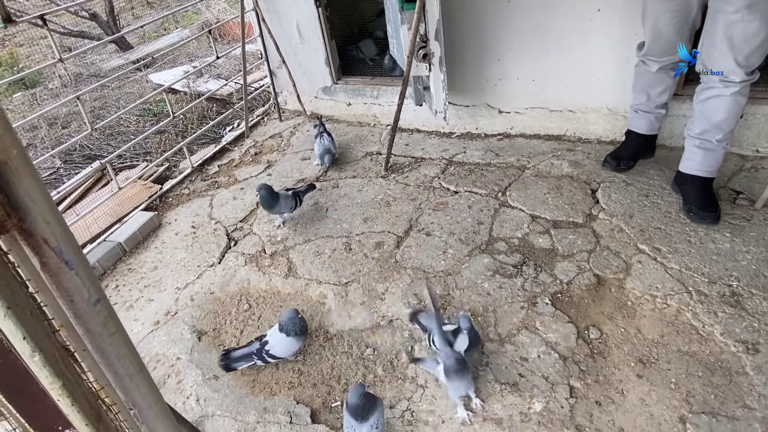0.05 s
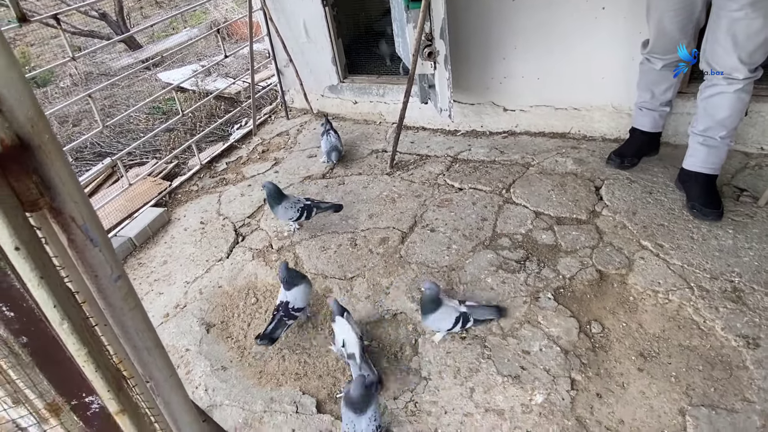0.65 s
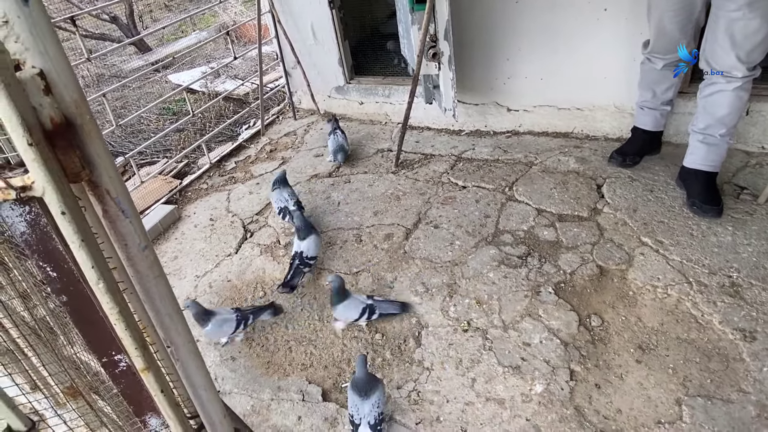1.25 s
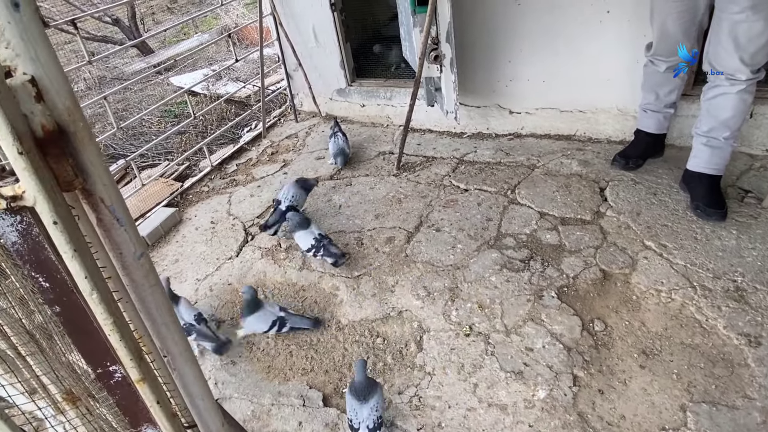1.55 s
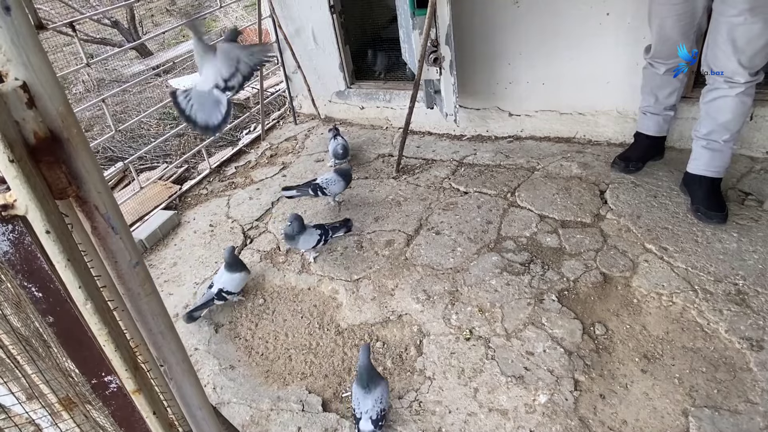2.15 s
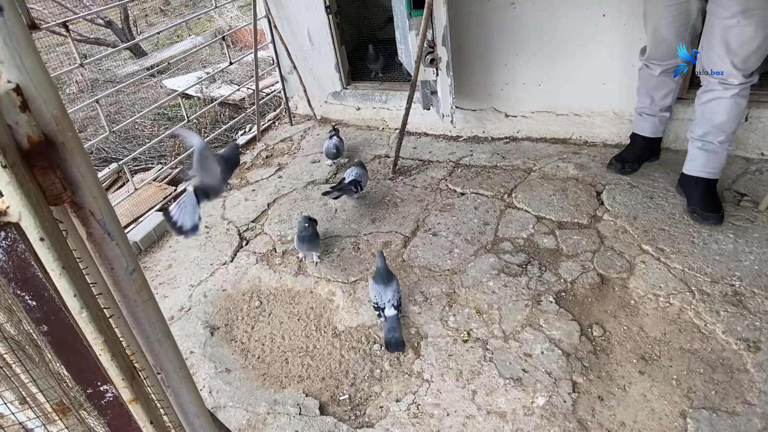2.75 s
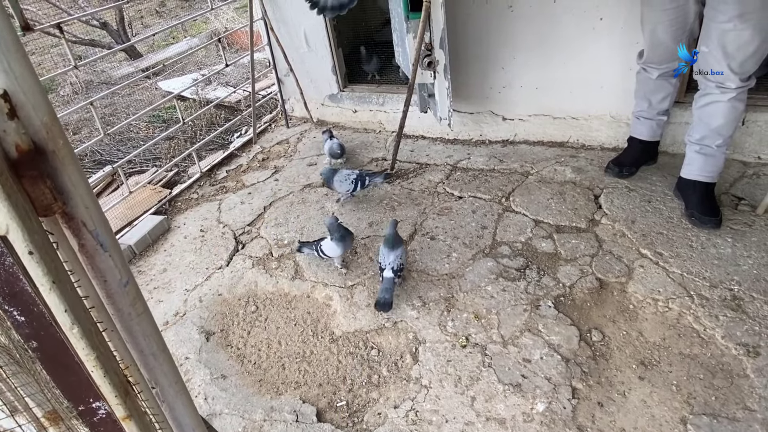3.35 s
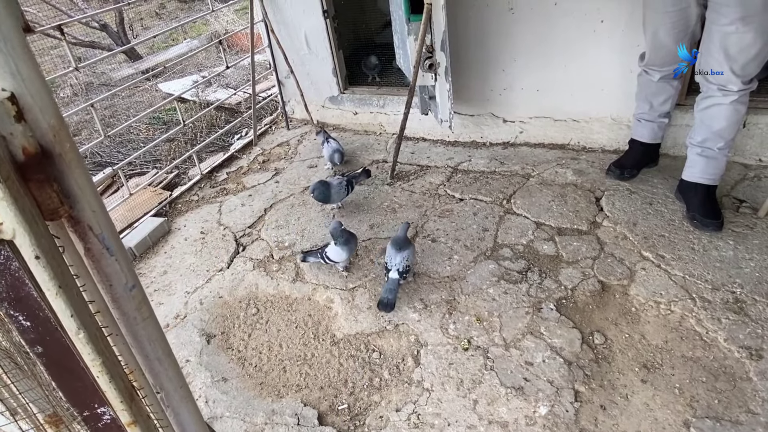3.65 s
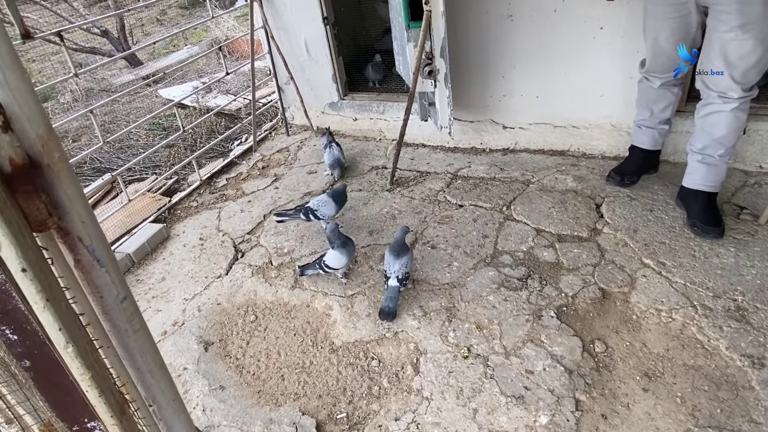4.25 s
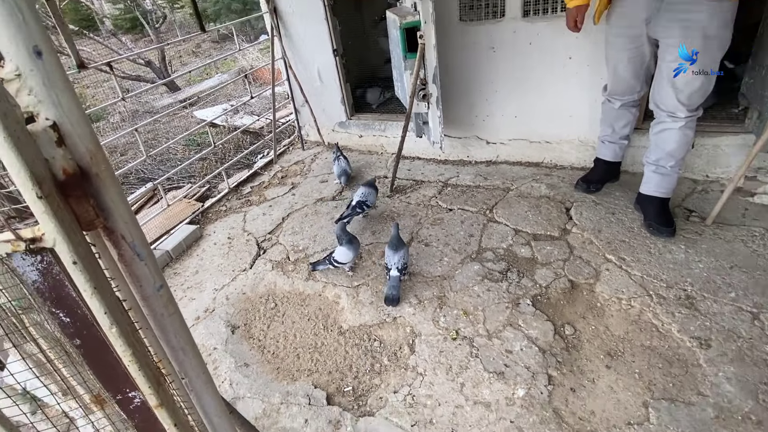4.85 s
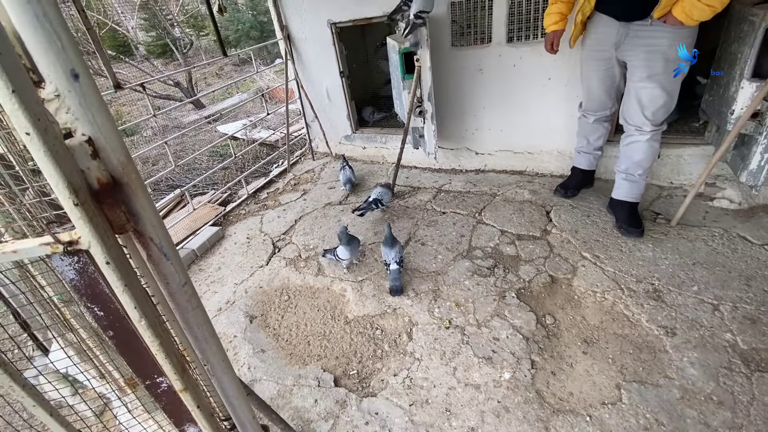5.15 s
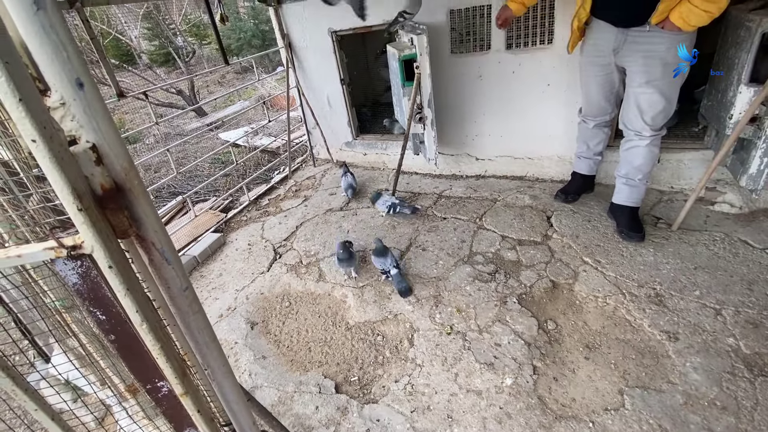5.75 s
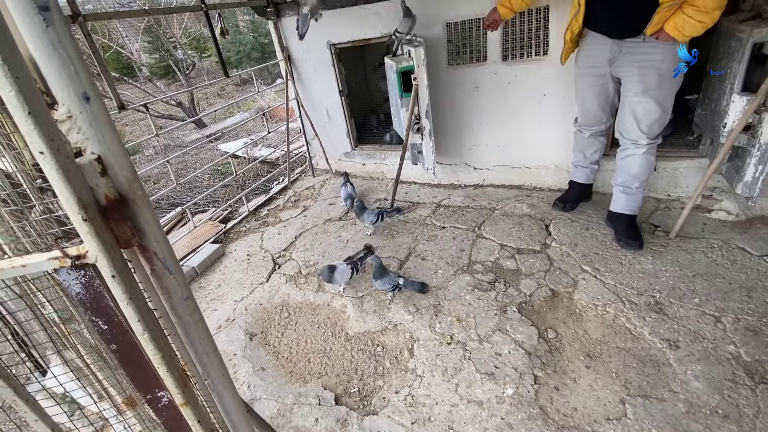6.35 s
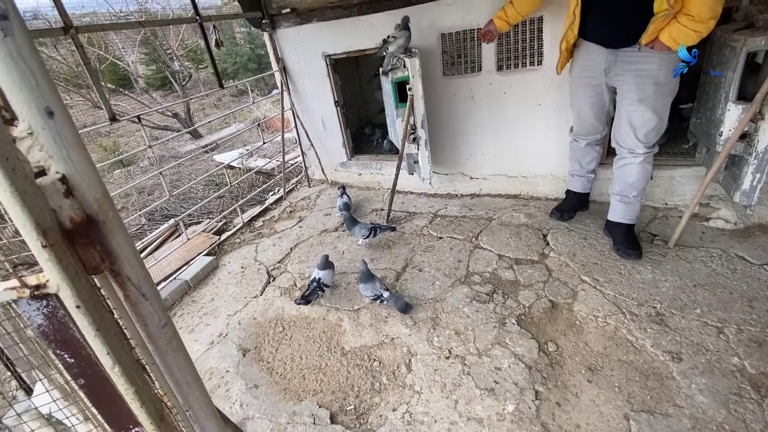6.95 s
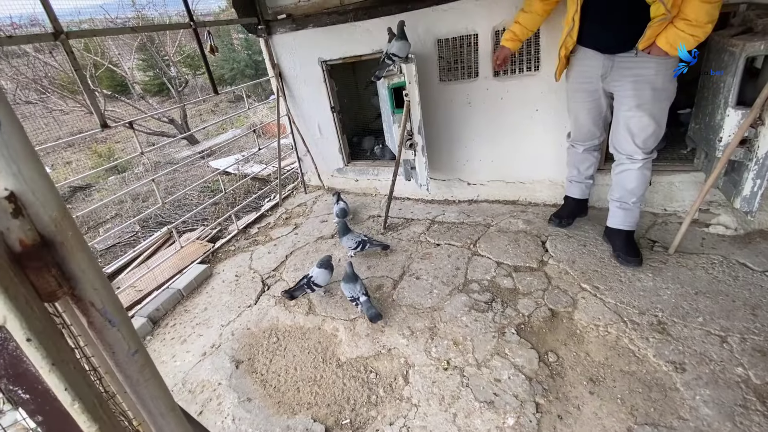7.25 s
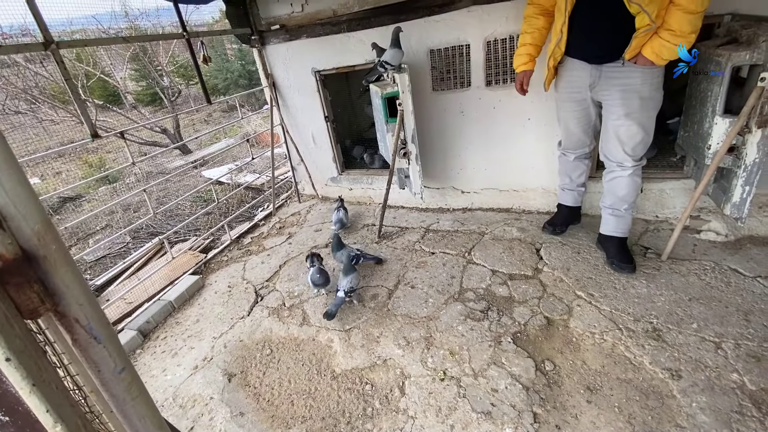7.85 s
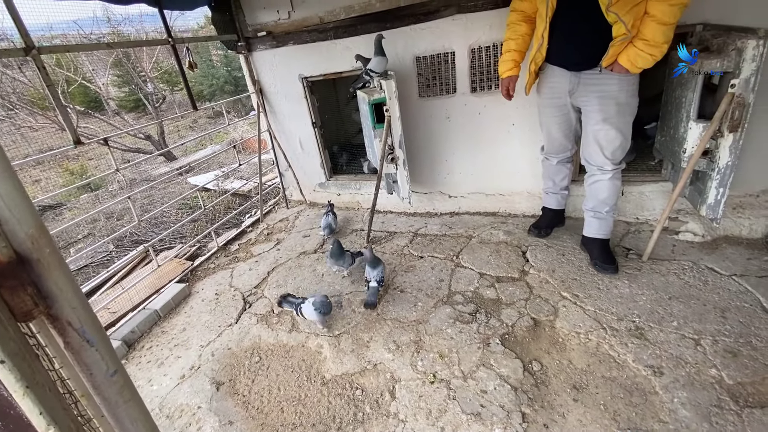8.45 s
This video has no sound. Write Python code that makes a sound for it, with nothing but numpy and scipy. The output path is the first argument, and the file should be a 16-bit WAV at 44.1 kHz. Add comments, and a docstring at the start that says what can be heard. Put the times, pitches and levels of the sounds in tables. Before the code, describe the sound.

In a quiet concrete yard, several pigeons coo in brief, gliding bouts. A sharp hollow knock opens the scene, followed by a run of clapping wingbeats that buffet the nearby microphone. Feathers rustle and feet scuff on grit between the coos. Later come a soft rush of wings, a few more claps and a thin, faint metallic ring under the last coos.

```python
"""Pigeons courting in a yard

Pigeons coo on the concrete beside their loft: gliding near-sine notes, some clean, some gurgling.
Birds squabble, take off and land with clapping wings, whose draught rumbles on the microphone.
A hard, hollow knock comes at the start, feet scuff on grit, and a thin metallic ring lingers at the end."""
import sys
import numpy as np
from scipy import signal
from scipy.fft import rfft, irfft, next_fast_len
from scipy.io import wavfile
from scipy.ndimage import uniform_filter1d, minimum_filter1d, map_coordinates

SR = 44100
rng = np.random.default_rng(int(sys.argv[2]) if len(sys.argv) > 2 else 0)


def file_out(sig):
    """Save sig as 16-bit WAV at sys.argv[1]."""
    # one column per channel
    cols = np.atleast_2d(sig).T
    # limit, then scale
    lim = np.clip(cols, -1, 1)
    pcm = np.round(lim * 32767).astype(np.int16)
    wavfile.write(sys.argv[1], SR, pcm)


N = 380141


def amp(db):
    """Decibels to gain."""
    return 10 ** (np.asarray(db) / 20)


def unit(x):
    """Scale to rms 1."""
    return x / np.sqrt(np.mean(x ** 2) + 1e-20)


def along(points, hz):
    """Read (Hz, value) points on a log frequency axis."""
    freqs, values = np.transpose(points)
    return np.interp(np.log(hz + 1), np.log(freqs + 1), values)


def fader(rows):
    """A fader ride in dB through (seconds, dB) points, silent outside them."""
    return np.interp(np.arange(N) / SR, *np.transpose(rows), left=-140, right=-140)


def wobble(rate, size):
    """A smooth random curve with rate knots a second."""
    knots = rng.standard_normal(int(size * rate / SR) + 4)
    return map_coordinates(knots, [np.arange(size) * rate / SR])


def phase_of(hz):
    """Running phase of a moving pitch."""
    return 2 * np.pi * np.cumsum(hz) / SR


def filtered(x, response):
    """EQ a sound with a gain given as a function of Hz."""
    size = next_fast_len(len(x) + 8192)
    return irfft(rfft(x, size) * response(np.fft.rfftfreq(size, 1 / SR)), size)[:len(x)]


def noise(spectrum, size):
    """Coloured noise of rms 1."""
    return unit(filtered(rng.standard_normal(size), lambda hz: amp(along(spectrum, hz))))


def narrow(hz, width, size):
    """A narrow noise band of rms 1 around a steady or moving pitch."""
    phase = phase_of(hz * np.ones(size))
    return unit(wobble(width, size) * np.sin(phase) + wobble(width, size) * np.cos(phase))


def patchy(x, depth_db):
    """Give noise peaks and dips that shift its colour from moment to moment."""
    spectra = signal.stft(x, nperseg=512)[2]
    patches = uniform_filter1d(rng.standard_normal(spectra.shape), size=5, axis=0)
    patches = uniform_filter1d(patches, size=9, axis=1)
    return signal.istft(spectra * amp(depth_db * unit(patches)), nperseg=512)[1][:N]


def burst(t, rise, t60):
    """A quick attack and an exponential decay."""
    return (1 - np.exp(-t / rise)) * amp(-60 * t / t60)


def add(track, s, sound):
    """Mix a sound into the track from s seconds on."""
    start = round(s * SR)
    sound = sound[max(-start, 0):]
    part = track[max(start, 0):][:len(sound)]
    part += sound[:len(part)]


def flurry(s, length, db, fade, rise, fall):
    """One flurry's envelope in dB: it rises, drifts while it lasts, then falls (slopes in dB a second)."""
    end_db = db - fade * length
    return fader([(s - 1, db - rise), (s, db), (s + length, end_db), (s + length + 1, end_db - fall)])


# The colours of rustling and of buffeting air. Each row: frequency in Hz, level in dB.
RUSTLE_COLOUR = [(130, -30.5), (280, 4), (500, 5), (850, 2.5), (1500, -4.5), (2300, -11), (4000, -17.5),
                 (5500, -29.5), (9000, -34.5), (12000, -59.5)]
DRAUGHT_COLOUR = [(11, -39.5), (18, 2.5), (41, 0.5), (76, -13.5), (113, -7), (157, -19), (300, -21),
                  (390, -48), (660, -120)]
# Flurries of bustle. Each row: start and length in seconds, relative rustle and draught levels in dB,
# fade in dB a second (negative swells).
FLURRIES = [ (0, 0.011, -68.5, -33.5, -2), (0.1, 0.11, -73, -41, 51), (0.278, 0.1, -56, -41, 6),
            (0.49, 0.14, -57, -36.5, 36), (0.708, 0.018, -65.5, -36.5, 23), (0.904, 0.24, -84.5, -66, 47.5),
            (1.516, 0.091, -72.5, -41, 54), (1.872, 0.32, -56.5, -43.5, -9.5),
            (2.344, 0.079, -66.5, -37, 18.5), (2.41, 0.15, -67, -41, 18), (2.59, 0.33, -56, -43.5, -20.5),
            (3.008, 0.21, -61, -46, 19), (3.307, 0.19, -67, -51, 3), (3.495, 0.22, -55.5, -42, 23),
            (3.848, 0.079, -62, -44.5, 26.5), (4.048, 0.62, -85, -66.5, 15), (4.448, 0.29, -76, -67, -12),
            (4.844, 0.21, -64, -43.5, -4), (5.114, 0.12, -59, -41.5, 44.5),
            (5.677, 0.099, -71.5, -44, 56.5), (5.882, 0.24, -72, -51, -41), (6.291, 0.34, -66.5, -37, 8),
            (6.62, 0.11, -54.5, -41, 3), (6.785, 0.39, -66.5, -46, 43), (7.286, 0.2, -61.5, -46.5, 1),
            (7.567, 0.31, -81, -69.5, 9.5), (8.486, 0.1, -65.5, -43.5, -57)]


def bustle(rustle_db=2, draught_db=-1, grain_db=2, fits_db=2, lumps_db=2):
    """Feathers and feet rustle in fits, and the air they stir buffets the microphone in lumps."""
    rustle_rides = [flurry(s, length, db, fade, rise=410, fall=180) for s, length, db, _, fade in FLURRIES]
    air_rides = [flurry(s, length, db, fade, rise=430, fall=220) for s, length, _, db, fade in FLURRIES]
    rustle = patchy(noise(RUSTLE_COLOUR, N), depth_db=4.3)
    rustle = unit(rustle * amp(grain_db * wobble(300, N) + fits_db * wobble(35, N)))
    draught = unit(noise(DRAUGHT_COLOUR, N) * amp(lumps_db * wobble(25, N)))
    return (amp(rustle_db + np.max(rustle_rides, axis=0)) * rustle
            + amp(draught_db + np.max(air_rides, axis=0)) * draught)


# The colour of pushed air. Each row: frequency in Hz, level in dB.
PUFF_COLOUR = [(60, -28), (170, -11.5), (290, 8), (450, 4.5), (750, -1.5), (1000, -5.5), (1600, -10),
               (3000, -46.5)]


def air_puff(size, note_hz, sharpness):
    """Air pushed by a wing sounds one broad, hollow note, at rms 1."""
    air = noise(PUFF_COLOUR, size)
    return unit(filtered(air, lambda hz: 1 / (1 + 1j * sharpness * np.log((hz + 1) / note_hz)) ** 2))


# The colour of swishing feathers. Each row: frequency in Hz, level in dB.
FEATHER_COLOUR = [(300, -24), (900, -8), (1700, 0), (2800, -5), (4200, -4.5), (6000, -14.5), (8500, -19.5),
                  (11000, -30.5), (15000, -29)]
# Wing strokes without a clap. Each row: peak time in seconds, swish level in dB,
# relative puff level in dB, the puff's note in Hz.
WING_STROKES = [(.004, -67, -32.5, 281), (.08, -49, -31, 580), (0.3, -54.5, -31.5, 269),
                (.505, -71, -41, 414), (.571, -55, -44.5, 427), (0.709, -58, -46.5, 604.4),
                (1.496, -78, -43, 351.5), (1.874, -57, -33.5, 535), (2.115, -53.5, -37, 504),
                (2.324, -60, -56, 1070), (2.595, -62, -46.5, 760), (2.697, -53, -40.5, 860),
                (2.837, -52, -31, 856), (3.18, -58.5, -58, 850), (3.351, -65.5, -54, 1060),
                (3.555, -57, -47, 680), (3.765, -59.5, -51.5, 897), (3.95, -64.5, -46.5, 555),
                (6.115, -65, -54.5, 900), (6.26, -64, -51.5, 810), (6.517, -63, -45, 820),
                (6.385, -58, -49.5, 1710), (6.47, -60, -46.5, 1470), (6.638, -59.5, -40.5, 810),
                (6.839, -75.5, -55, 1120), (6.71, -53, -42.5, 434), (7.342, -46, -51, 535),
                (7.398, -72, -51, 780), (8.526, -72, -45, 516)]


def wing_strokes(air_db=-1, t60=.14, grain_db=3, hover_s=6.04, hover_period_s=.131):
    """A free wing stroke swells, pushes a hollow puff of air and dies away; a hover is five even beats."""
    out, t = np.zeros(N), np.arange(-SR // 10, SR // 4) / SR
    hover = [(hover_s + hover_period_s * beat, -72.5, -43, 380) for beat in range(5)]
    for s, swish_db, puff_db, note_hz in WING_STROKES + hover:
        swell_s = .0099 * 446.4 / note_hz  # lower, wider sweeps take longer
        envelope = np.where(t < 0, np.exp(-(t / swell_s) ** 2), amp(-60 * t / t60))
        cutoff_hz = 6000 * np.exp(.39 * (swish_db + 56.5))  # harder strokes are brighter
        hiss = filtered(noise(FEATHER_COLOUR, len(t)), lambda hz: 1 / (1 + (hz / cutoff_hz) ** 2))
        swish = unit(hiss * amp(grain_db * wobble(460, len(t))))
        puff = air_puff(len(t), note_hz, sharpness=2.2)
        add(out, s + t[0], envelope * (amp(swish_db) * swish + amp(puff_db + air_db) * puff))
    return out


# The colour of the knock's crack. Each row: frequency in Hz, level in dB.
CRACK_COLOUR = [(400, -10.5), (1500, -9), (3200, -19), (4200, 2), (4850, 3), (5400, -10), (7500, -24),
                (8700, -24), (10500, -45.5), (15000, -56)]
# Modes of the knocked body. Each row: pitch in Hz, relative level in dB, 60 dB decay time in seconds.
BODY_MODES = [(269, -0.5, 0.059), (354, -9.5, 0.085), (488.6, -13, 0.054), (601, -16.5, 0.085),
              (830, -24, 0.11), (968, -21, 0.1), (1710, -36, 0.097), (2470, -37, 0.08)]


def knock(s=.0895, body_db=.5, crack_db=-15.5, splash_db=-24, rattle_db=-23):
    """A hard contact close by: a bright crack and a splash of noise; a hollow body rings and rattles."""
    out, t = np.zeros(N), np.arange(SR // 3) / SR
    body = sum(amp(db) * burst(t, .0025, t60) * np.sin(2 * np.pi * (hz * t + rng.random()))
               for hz, db, t60 in BODY_MODES)
    add(out, s + .00089, amp(body_db) * body)
    add(out, s, amp(crack_db) * noise(CRACK_COLOUR, len(t)) * burst(t, rise=.0002, t60=.017))
    add(out, s, amp(splash_db) * noise(RUSTLE_COLOUR, len(t)) * burst(t, rise=.00075, t60=.11))
    add(out, s, amp(rattle_db) * noise(PUFF_COLOUR, len(t)) * burst(t, rise=.0034, t60=.11))
    return out


# Dull bumps. Each row: start in seconds, relative level in dB, pitch in Hz.
BUMPS = [(0.092, -22.5, 120.5), (.703, -31, 147), (1.505, -43, 149.6), (2.612, -36, 76.4),
         (3.854, -37, 138.6), (4.735, -47, 157), (5.115, -26, 104), (7.326, -34.5, 34.7)]


def bumps(gain_db=7.5):
    """Soft, heavy contacts give a few uneven low cycles."""
    out, t = np.zeros(N), np.arange(SR // 4) / SR
    for s, db, hz in BUMPS:
        phase = phase_of(hz * (1 + .29 * wobble(130, len(t))))
        add(out, s, amp(db + gain_db) * burst(t, rise=.011, t60=.12) * np.sin(phase))
    return out


def glide(length, first_hz, last_hz, arch, level_db, attack_s=.0074, release_s=.0095, dome_db=.5):
    """Time, pitch and level of a coo: the pitch slides along an arch as the level rises, domes, falls."""
    t = np.arange(-SR // 20, (length + .06) * SR) / SR
    progress = np.clip(t / length, -.15, 1.15)
    bow = 4 * progress * (1 - progress)
    pitch = first_hz * (last_hz / first_hz) ** progress * 2 ** (arch * bow / 12)
    outside = np.maximum(-t, 0) / attack_s + np.maximum(t - length, 0) / release_s
    return t, pitch, level_db - dome_db * (1 - bow) - 10 * outside


def crop_gain(hz, resonance_hz=616, q=1.4):
    """The swollen crop resonates and damps the overtones above its note."""
    ratio = hz / resonance_hz
    return 1 / np.hypot(1 - ratio ** 2, ratio / q)


# The colour of air rasping through a rough coo. Each row: frequency in Hz, level in dB.
RASP_COLOUR = [(600, -8), (880, 3), (1150, -4.5), (1400, -26), (1700, -10.5), (2000, -4), (2250, -32.5),
               (4000, -40.5)]


def coo(pitch, db, rough, gurgle_hz=42, flutter=.8, hoarse=.6, jitter=.11, growl_db=-5, hiss_db=-18):
    """The syrinx sings a near sine; the crop colours its overtones, and a flutter makes it gurgle."""
    size = len(pitch)
    gurgle = np.sin(phase_of(gurgle_hz * (1 + .3 * wobble(30, size))))
    waver = .015 * wobble(40.5, size) + rough * jitter * (gurgle + wobble(171.1, size))
    phase = phase_of(pitch * (1 + waver))
    overtones = sum(amp(level) * np.sin(k * phase) * crop_gain(k * pitch)
                    for k, level in ((2, -34), (3, -40)))
    richness = amp(12 * rough + 1.15 * (db + 47))  # loud, rough notes have stronger overtones
    # irregular cycles smear the tone into a throaty band
    smear = hoarse * rough * (wobble(300, size) * np.sin(phase) + wobble(300, size) * np.cos(phase))
    # every other cycle of a rough note is stronger: a growl an octave down
    growl = amp(growl_db) * rough * np.sin(phase / 2)
    tremolo = (1 + rough * flutter * gurgle) * amp(1.23 * wobble(45, size))
    hiss = amp(hiss_db) * rough ** 2 * noise(RASP_COLOUR, size) * (1 + .5 * np.sin(phase))
    return amp(db) * tremolo * np.sqrt(2) * (np.sin(phase) + smear + growl + hiss + richness * overtones)


# The near reflection of the coos. Each row: delay in seconds, level in dB.
WALL_ECHOES = [(.019, -13.5)]
# Coo notes. Each row: start and length in seconds, first and last pitch in Hz, arch in semitones,
# level in dB, roughness from 0 to 1.
COO_NOTES = [(0.254, 0.05, 690, 584, -2, -48, 0.44), (0.323, 0.035, 517, 365, -1.5, -53, 0.18),
             (0.376, 0.0996, 370.3, 299.4, 2.5, -44.5, 0.09), (0.469, 0.1, 693, 539, -0.2, -52, 0.25),
             (1.357, 0.049, 356, 395, 0, -60.5, 0.64), (1.667, 0.13, 581.6, 543, 1, -61, 0.3),
             (1.965, 0.053, 392.5, 262, -0.6, -38.5, 0.48), (2.101, 0.32, 512.6, 437, -1, -57, 0.52),
             (3.084, 0.096, 430.3, 550, 0, -53, 0.18), (3.222, 0.058, 354, 336, 0.15, -53, 0.07),
             (3.388, 0.1, 476.6, 443, 0, -51.5, 0.31), (4.028, 0.083, 303.6, 363, 0.5, -52.5, 0.41),
             (4.12, 0.037, 505, 463, 0.2, -48.5, 0.13), (4.131, 0.015, 378, 350, 1.2, -46.5, 0.13),
             (4.319, 0.15, 490, 266.3, -2.5, -48.5, 0.2), (4.465, 0.051, 486, 450, 0.0, -50.5, 0.1),
             (4.535, 0.066, 473, 448, -2.1, -56.5, 0.31), (5.166, 0.092, 172.3, 323, 2, -55.5, 0.6),
             (5.272, 0.039, 230, 246, 0.5, -42, 0.5), (5.318, 0.049, 275, 246, 1.5, -38.5, 0.31),
             (5.41, 0.037, 275, 228.6, 2, -37.5, 0.33), (5.476, 0.056, 470, 444, 0, -50, 0.25),
             (5.522, 0.029, 330, 280, 0, -53, 0.87), (5.59, 0.12, 520, 457, 0.5, -66, 0.2),
             (5.704, 0.031, 483, 445, -1, -53.5, 0.33), (5.81, 0.043, 425, 366, 1.5, -53.5, 0.37),
             (5.927, 0.025, 336.4, 328, -0.4, -50, 0.14), (7.345, 0.13, 470, 583, 1.5, -55, 0.46),
             (7.48, 0.074, 490, 525, -0.2, -51.5, 0.3), (7.568, 0.037, 535, 381, 0.5, -47.5, 0.09),
             (7.627, 0.12, 360, 315, 3, -46, 0.06), (7.718, 0.049, 770, 650, 0.3, -64, 0.2),
             (7.768, 0.052, 635, 456, 0, -53.5, 0.28), (8.146, 0.024, 612, 556, -1.5, -79.5, 0.58),
             (8.384, 0.2, 440, 482.5, -0.5, -64.5, 0.25)]


def pigeons():
    """The coos of several birds overlap; a wall reflection makes the gliding notes waver."""
    out = np.zeros(N)
    for s, length, first_hz, last_hz, arch, note_db, rough in COO_NOTES:
        t, pitch, db = glide(length, first_hz, last_hz, arch, note_db)
        call = coo(pitch, db, rough)
        add(out, s + t[0], call)
        for delay, wall_db in WALL_ECHOES:
            add(out, s + t[0] + delay, amp(wall_db) * call)
    return out


# The colour of slapping quills. Each row: frequency in Hz, level in dB.
SLAP_COLOUR = [(300, -4.5), (900, 2.5), (1700, 0), (2800, -3), (4200, -6.5), (6000, -15), (8500, -20.5),
               (11000, -29.5), (15000, -31.5)]
# The hollow cupped between the wings. Each row: multiple of the clap's note, relative level in dB.
CUP_MODES = [(1, -2), (1.85, -3.5)]
# Wing claps. Each row: start in seconds, relative level in dB, offsets of the puff and of the pop in dB,
# note in Hz, lag of the slap in seconds.
WING_CLAPS = [(0.4334, -40, -7, -12, 810, 0.00046), (1.947, -40, 8.5, 6.5, 1052, .004),
              (2.06, -37.5, 6.5, -4.5, 733, .005), (2.1715, -34.5, -0.5, -10, 906, .004),
              (2.655, -38, -11, 6, 853, .0005), (2.7834, -36, 3, 10.5, 864, .001),
              (2.9092, -35, 1, 7, 783, .006), (3.0203, -34.5, -0.5, 0, 900, .01),
              (7.308, -40, -2.5, -5.5, 523, .004), (7.432, -44.5, 8, -7.5, 624, .005)]


def wing_claps(snap_db=-1, slap_db=-2, cup_db=-3, air_db=-4, grain_db=3, snap_t60=.032):
    """Wing tips meet with a snap and a woody pop; quills slap and squeeze out air, whose hollow rings."""
    out, t = np.zeros(N), np.arange(SR // 4) / SR
    for s, db, puff_db, pop_db, note_hz, lag in WING_CLAPS:
        quills = unit(noise(SLAP_COLOUR, len(t)) * amp(grain_db * wobble(600, len(t))))
        pop = np.sin(phase_of(note_hz * (1 + .15 * wobble(650, len(t)))))
        cup = sum(amp(level) * narrow(k * note_hz, 200, len(t)) for k, level in CUP_MODES)
        snap = noise(SLAP_COLOUR, len(t))
        puff = air_puff(len(t), note_hz, sharpness=.92)
        glancing_db = 1199 * lag  # the later the slap, the more glancing and soft the first snap
        add(out, s, amp(db + snap_db - glancing_db - 60 * t / snap_t60) * snap)
        add(out, s, amp(db + pop_db) * pop * burst(t, rise=.00056, t60=.037))
        add(out, s + lag, amp(db + slap_db) * quills * burst(t, rise=.0029, t60=.1))
        add(out, s + lag, amp(db + cup_db) * cup * burst(t, rise=.0028, t60=.066))
        add(out, s + lag, amp(db + puff_db + air_db) * puff * burst(t, rise=.00098, t60=.12))
    return out


# The colour of a ticking stone. Each row: frequency in Hz, level in dB.
STONE_COLOUR = [(500, 4), (2500, 14.5), (5000, 11), (9000, 3.5), (13000, -57)]
# Grit cracking underfoot. Each row: start in seconds, level in dB, low cut in Hz.
GRIT_TICKS = [(3.6543, -37, 600), (3.934, -60, 4500), (4.684, -57, 4370), (5.09, -56.5, 3080),
              (5.1202, -49, 1015), (6.367, -50, 1190)]


def grit():
    """Stones tick on the concrete; the smaller the stone, the higher the tick."""
    out, t = np.zeros(N), np.arange(SR // 10) / SR
    for s, db, low_hz in GRIT_TICKS:
        tick = unit(filtered(noise(STONE_COLOUR, len(t)), lambda hz: 1 - 1 / (1 + (hz / low_hz) ** 6)))
        add(out, s, amp(db) * burst(t, rise=.00037, t60=.014) * tick)
    return out


# Faint squeaks and scrapes. Each row: peak time in seconds, level in dB, pitch in Hz,
# half length in seconds, bandwidth in Hz.
SQUEAKS = [(4.607, -76, 4000, .02, 800), (4.672, -69, 1800, .014, 600), (5.053, -60, 1750, .006, 600),
           (6.12, -59, 1500, .022, 300), (6.25, -58, 1530, .025, 300), (6.925, -75, 4500, .025, 2500),
           (6.98, -68, 1100, .16, 300), (7.15, -80, 3800, .02, 3000), (7.884, -69, 1126, .022, 260)]


def squeaks():
    """Hoarse, narrow bands of noise swell and fade."""
    out, t = np.zeros(N), np.arange(-SR // 2, SR // 2) / SR
    for s, db, hz, half_length, width in SQUEAKS:
        add(out, s + t[0], amp(db) * np.exp(-(t / half_length) ** 2) * narrow(hz, width, len(t)))
    return out


# The colour of the rush, then its resonances. Each row: frequency in Hz, level in dB.
RUSH_COLOUR = [(250, -17), (600, -0.5), (1100, 2), (1900, -1), (2700, -8), (4200, -14), (5500, -26.5),
               (13000, -51)]
RUSH_RESONANCES = [(760, -6), (1130, -9), (1520, -12.5)]
# The fader ride of the rush. Each row: time in seconds, relative level in dB.
RUSH_RIDE = [(4.78, -77), (4.84, -62.5), (4.96, -57), (5.07, -70), (5.14, -60.5), (5.3, -72), (5.5, -87),
             (5.83, -89), (5.89, -68.5), (6.05, -57.5), (6.2, -61), (6.38, -58.5), (6.68, -54),
             (6.8, -66.5), (7.0, -69.5), (7.3, -77)]


def feather_rush(gain_db=-2, drift=.05, width_hz=70, waver_db=4, grain_db=1.8):
    """A feathery rush of air swells and fades, where faint resonances drift and waver."""
    resonances = np.zeros(N)
    for hz, db in RUSH_RESONANCES:
        gain = amp(db + waver_db * wobble(14, N))
        resonances += gain * narrow(hz * (1 + drift * wobble(7.8, N)), width_hz, N)
    puffs = patchy(noise(RUSH_COLOUR, N), depth_db=3.3)
    feathers = unit(puffs * amp(grain_db * wobble(200, N)))
    return amp(gain_db + fader(RUSH_RIDE)) * unit(feathers + resonances)


# The fader ride of the metallic ring. Each row: time in seconds, level in dB.
RING_RIDE = [(7.62, -87), (7.76, -65), (7.88, -81.5), (7.95, -69), (8.03, -81.5), (8.18, -90.5),
             (8.55, -76.5)]


def metal_ring(hz=814, waver_hz=3, waver_db=1):
    """One faint, slightly wavering note, as of a steel rail."""
    phase = phase_of(hz + waver_hz * wobble(34, N))
    return amp(fader(RING_RIDE) + waver_db * wobble(20, N)) * np.sin(phase)


# The yard's reverb. Each row: frequency in Hz, 60 dB decay time in seconds.
YARD_DECAY = [(150, 0.73), (500, 0.33), (3000, 0.069), (12000, 0.34)]


def yard_reverb(send):
    """The loft wall and the ground answer with a short tail."""
    hz, t, spectra = signal.stft(rng.standard_normal(SR // 2), SR, nperseg=256)
    decay = amp(-60 * t / along(YARD_DECAY, hz)[:, None])
    tail = signal.istft(spectra * decay, SR, nperseg=256)[1]
    predelayed = np.pad(send, (300, 0))
    return signal.fftconvolve(predelayed, tail / np.linalg.norm(tail))[:N]


# The colour of the quiet background bed. Each row: frequency in Hz, level in dB.
BED_COLOUR = [(25, -2), (200, -6.5), (550, -14), (1000, -22), (3000, -27.5), (15000, -37.5)]


def scene(coo_send_db=-10, wing_send_db=-11.5, knock_send_db=-27, bed_db=-85):
    """The mono mix: birds in the yard, the close knock and stirred air over a very quiet bed."""
    voices = pigeons() + squeaks()
    wings_and_feet = wing_claps() + wing_strokes() + grit()
    knocks = knock() + bumps()
    send = amp(coo_send_db) * voices + amp(wing_send_db) * wings_and_feet + amp(knock_send_db) * knocks
    mix = voices + wings_and_feet + knocks + yard_reverb(send) + bustle() + feather_rush() + metal_ring()
    return (mix + amp(bed_db) * noise(BED_COLOUR, N))[None]


def record(dry, limit_db=-9.1, hold_s=.003, top_hz=15300):
    """A limiter holds down the loudest peak, and a steep low-pass cuts the top of the treble."""
    hold = round(hold_s * SR)
    needed = np.minimum(1, amp(limit_db) / (np.abs(dry[0]) + 1e-9))
    gain = uniform_filter1d(minimum_filter1d(needed, hold), hold)
    return filtered(gain * dry[0], lambda hz: hz < top_hz)[None]


dry = scene()
out = record(dry)
file_out(out)
```